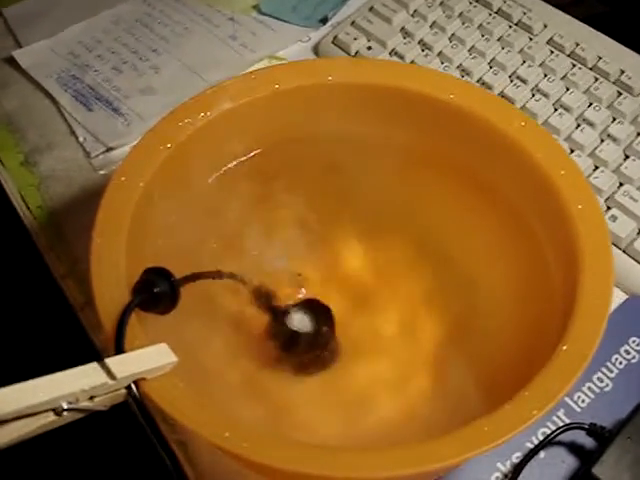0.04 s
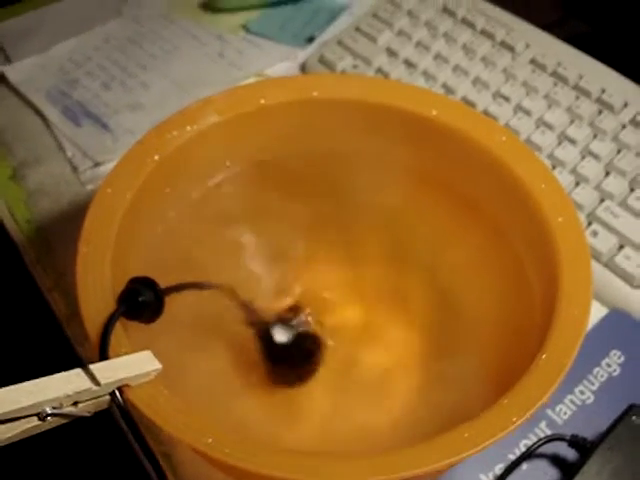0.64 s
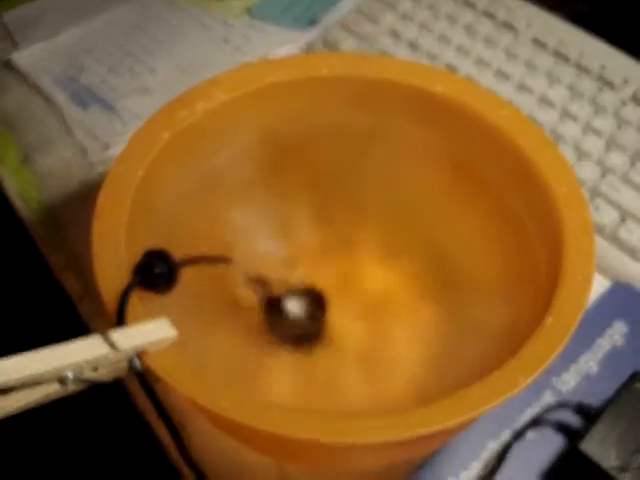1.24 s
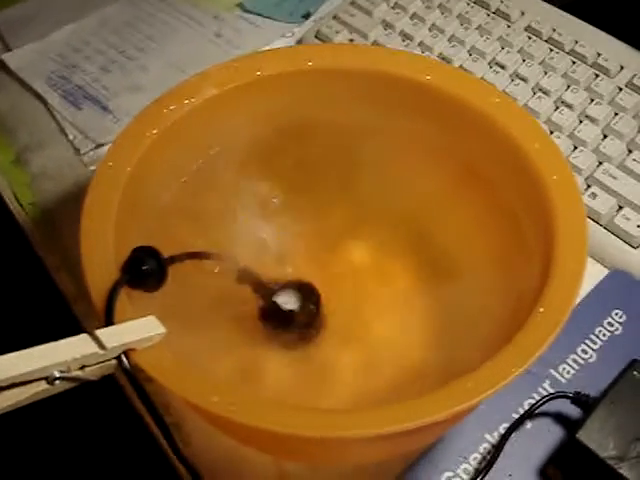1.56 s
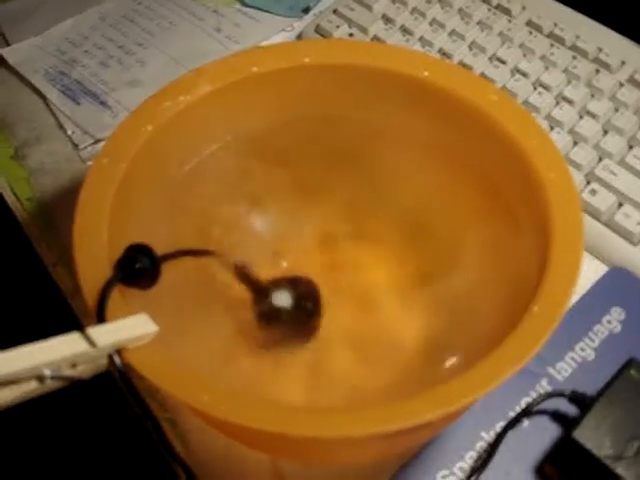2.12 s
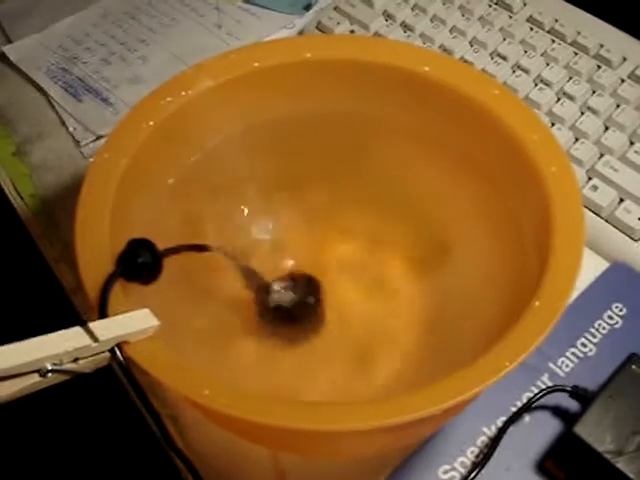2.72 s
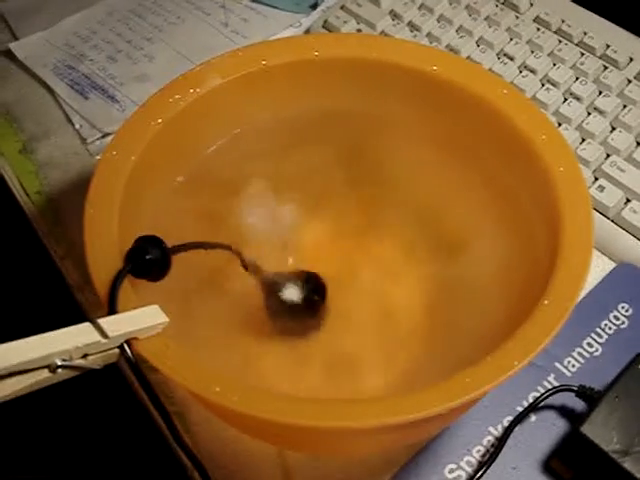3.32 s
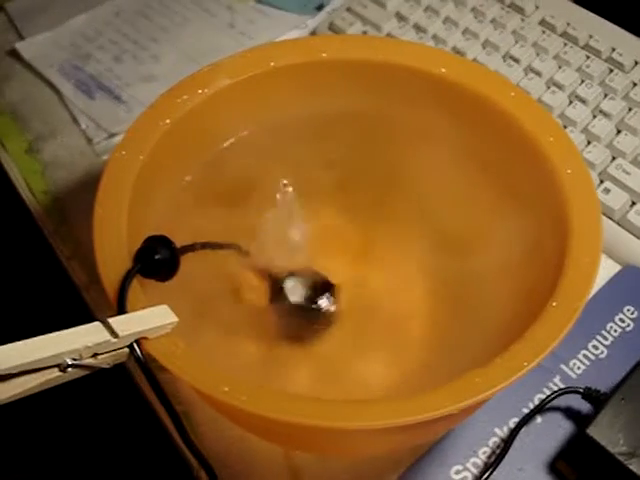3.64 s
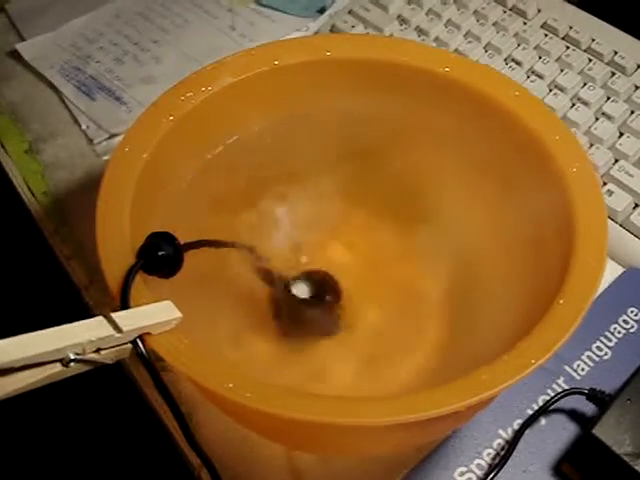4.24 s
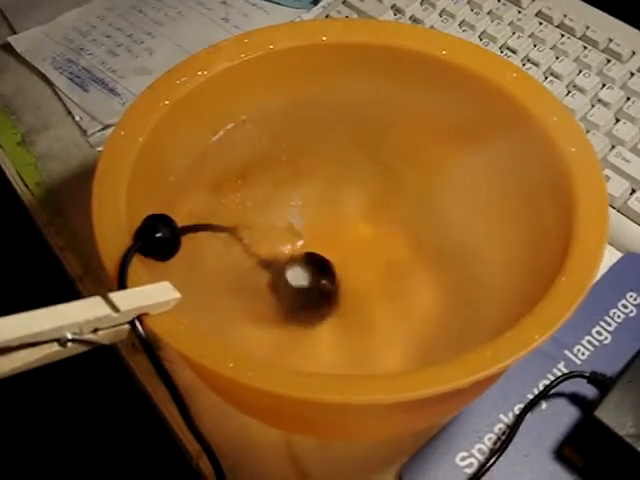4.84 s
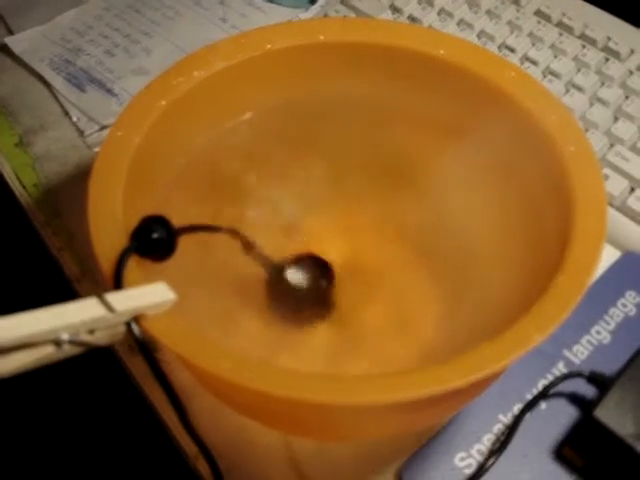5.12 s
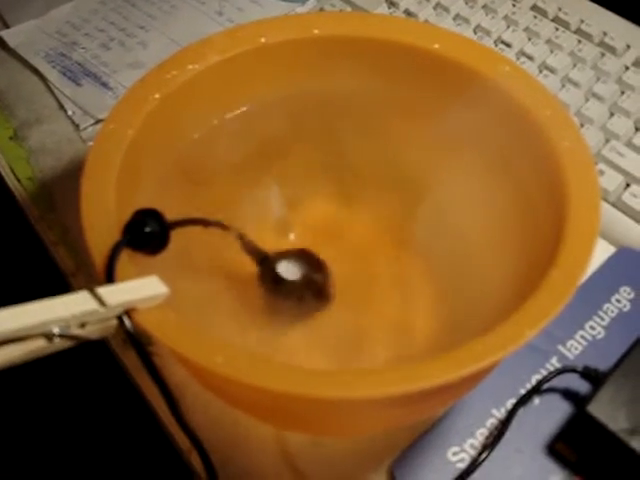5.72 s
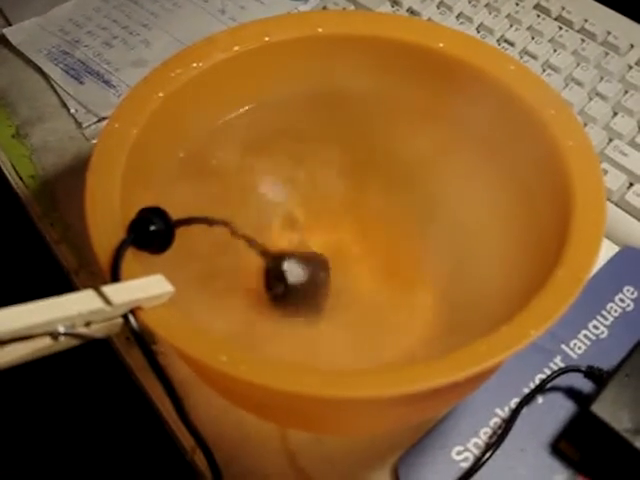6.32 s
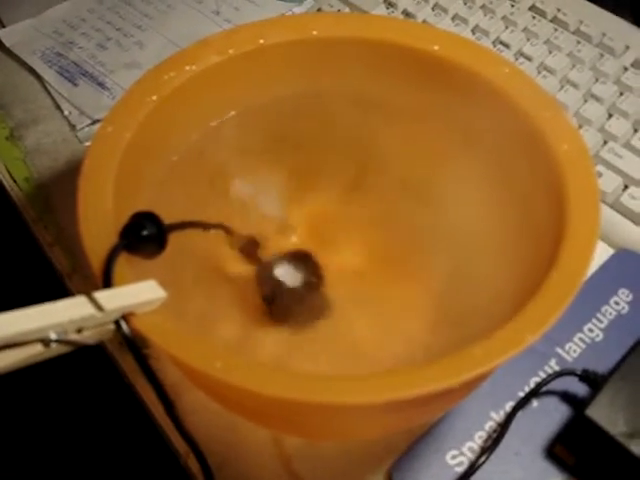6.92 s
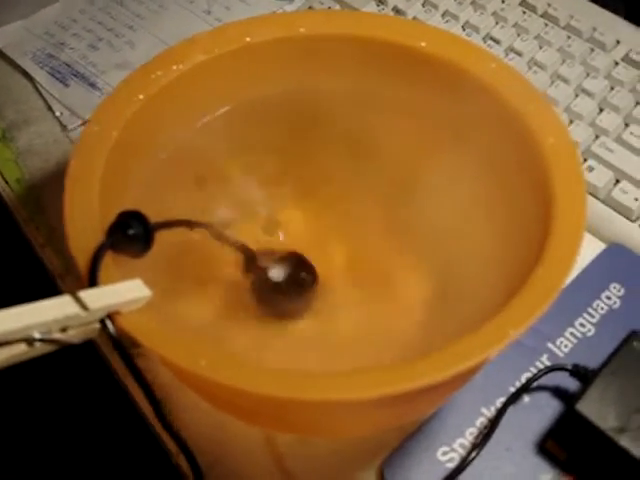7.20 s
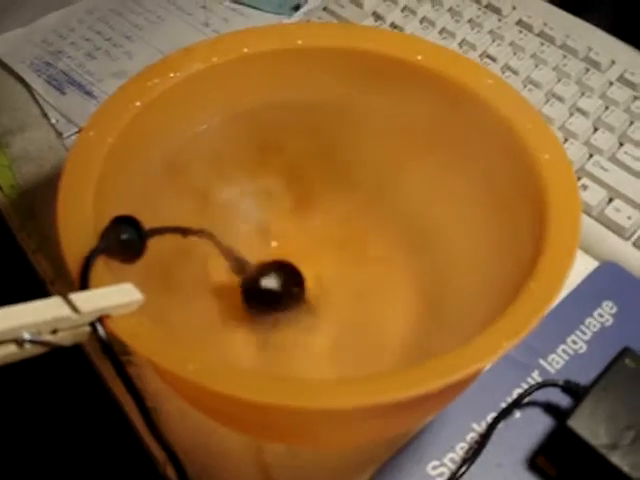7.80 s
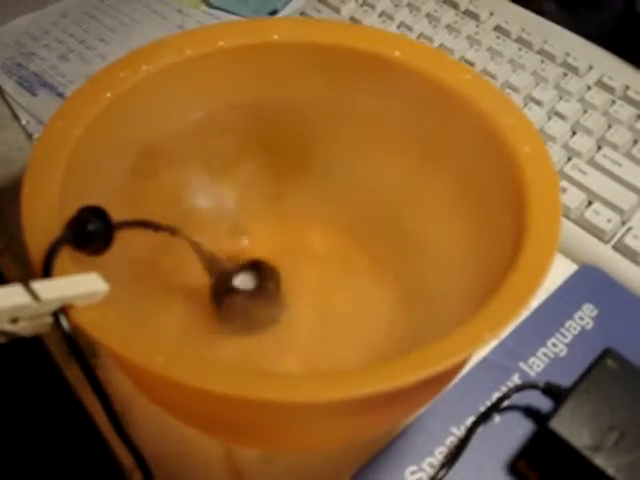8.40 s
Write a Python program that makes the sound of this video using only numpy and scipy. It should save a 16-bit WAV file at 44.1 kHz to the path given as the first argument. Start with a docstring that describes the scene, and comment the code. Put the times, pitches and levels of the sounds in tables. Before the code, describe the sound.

A small mist maker runs in a plastic bucket of water, heard close up in a quiet room with almost no echo. Throughout, the soft hum and airy rush of a computer fan lie under a thin electronic whine, a faint even hiss and barely audible specks of spray. The water spits short, sharp ticks at about 0.3, 0.5, 1.1, 2.5 and 3.8 seconds. Between them, stray droplets make tiny high plinks, around 0.1, 1.2, 1.7, 3.4 and 3.8 seconds, and one lands with a dry tap near 2.8 seconds. From about 5.1 to 6.4 seconds the droplets cluster into brighter, louder plinks, the strongest at 6 seconds. The fan's whirr drops slightly at around 5.5 seconds. After the cluster, the hum, whine, hiss and faint spray carry on steadily until the end at about 8.4 seconds.

```python
"""An ultrasonic mist maker runs in a plastic bucket of water on a desk in a quiet room.
From the start a hum and rush, most likely a computer fan, lie under an electronic whine and mist hiss.
For four seconds the fountain spits sharp ticks, and stray droplets trap bubbles that ring briefly;
one lands with a dry tap near 2.8 s. Around 6 s the droplets cluster and the fan's whirr sinks.
The steady sounds and a faint spray carry on to the end."""
import sys
import numpy as np
from scipy import signal
from scipy.fft import rfft, irfft
from scipy.io import wavfile
from scipy.ndimage import uniform_filter1d

SR = 44100
rng = np.random.default_rng(int(sys.argv[2]) if len(sys.argv) > 2 else 0)


def to_wav(s):
    """Save 16-bit WAV."""
    ch = np.atleast_2d(s).T  # columns
    pcm = np.round(np.clip(ch, -1, 1) * 32767)  # PCM
    wavfile.write(sys.argv[1], SR, pcm.astype(np.int16))


N = 373086


def undb(db):
    """Amplitude ratio of a level in decibels: tenfold for every 20 dB."""
    return 10 ** (np.asarray(db) / 20)


def walk(rate_hz):
    """Low-pass random drift: held random values, smoothed twice, with a spread near 1."""
    hold = max(int(SR / rate_hz), 2)
    held = np.repeat(rng.standard_normal(N // hold + 1), hold)
    return 1.332 * uniform_filter1d(uniform_filter1d(held, hold), hold)[:N]


def coloured_noise(spectrum, resonances=()):
    """Spectral shaping: white noise takes a density in dB per Hz, plus bell-shaped peaks and dips."""
    hz = np.maximum(np.fft.rfftfreq(N, 1 / SR), 1)
    at_hz, at_db = np.transpose(spectrum)
    db = np.interp(np.log(hz), np.log(at_hz), at_db)
    for centre, width, lift in resonances:
        db = db + lift * .5 ** ((2 * (hz - centre) / width) ** 2)
    return irfft(rfft(rng.standard_normal(N)) * undb(db) * np.sqrt(SR / 2), N)


def ring(hz, t60_s, glide=0., attack_s=.0001, size=4096):
    """Damped oscillation: a struck resonance whose pitch moves by the share `glide` as it decays."""
    t = np.arange(size) / SR
    pitch = hz * (1 + glide * np.minimum(t / t60_s, 1))
    envelope = np.exp(-np.log(1000) * t / t60_s) * (1 - np.exp(-t / attack_s))
    return envelope * np.sin(2 * np.pi * np.cumsum(pitch) / SR)


def bucket(x, echoes):
    """Comb filtering: the direct sound interferes with its quick reflections inside the bucket."""
    hz = np.fft.rfftfreq(len(x), 1 / SR)
    paths = 1 + sum(gain * np.exp(-2j * np.pi * hz * delay_s) for delay_s, gain in echoes)
    return irfft(rfft(x) * paths, len(x))


def scatter(x, t60_s, wet_db, gap_s, size=16384):
    """Diffuse reflection: a random tail starts after a short gap and decays exponentially."""
    t = np.arange(size) / SR
    tail = rng.standard_normal(size) * np.exp(-np.log(1000) * t / t60_s) * np.clip(t / gap_s - 1, 0, 1)
    return undb(wet_db) * signal.fftconvolve(x, tail / np.linalg.norm(tail))[:N]


def fan(shaft_hz=47.56, blades=7, wander=.001126, flutter_db=1.5, flutter_db_per_order=.1536):
    """Rotation gives harmonics of a wandering shaft rate; turbulence adds a rush and a narrow whirr."""
    # harmonics of the hum: shaft_multiple, level_db
    harmonics = [(5, -64), (6, -81), (7, -63), (9, -77), (12, -83), (14, -69), (20, -75.5), (21, -75.5),
                 (24, -74.5), (28, -77)]
    # blade-passing tone, fuller at first: time_s, gain_db
    blade_gain = [(0, 1.5), (2.8, 0.7), (3.5, -.4), (8.4, 0)]
    # its octave, which grows clearer: time_s, gain_db
    octave_gain = [(0, -2), (3, -2), (3.7, 1.2), (8.4, .3)]
    # strongest resonance of the rush: frequency_hz, density_db_per_hz
    whirr_spectrum = [(660, -130), (740, -86.5), (760, -82.5), (780, -80), (805, -88.5), (870, -130)]
    # the whirr sinks late on: time_s, gain_db
    whirr_gain = [(0, 1.9), (5.3, 2), (5.8, -2.7), (8.4, -1.3)]
    # rush of air: frequency_hz, density_db_per_hz
    air_spectrum = [(8, -89), (28, -83), (50, -94.5), (100, -91), (200, -86), (400, -83.5), (580, -88),
                    (880, -86.5), (1250, -87), (2000, -89), (2600, -90), (3300, -94), (5000, -100),
                    (10000, -106)]
    # hollow resonances and dips in the rush: centre_hz, width_hz, lift_db
    hollows = [(474, 56, 4.3), (560, 70, -0.5), (660, 42, 4.5), (758, 88, 7), (1012, 94, 6),
               (1111, 59, 5.5), (1323, 56, 1.5), (1570, 217, 5.5), (1768, 145, 4), (2880, 87, -4.5),
               (3000, 210, 2), (3270, 85, -3.5)]
    t = np.arange(N) / SR
    turns = np.cumsum(shaft_hz * (1 + wander * walk(1.5))) / SR
    hum = np.zeros(N)
    for order, db in harmonics:
        phase = 2 * np.pi * (order * turns + rng.random())
        # the higher harmonics waver more
        waver_db = flutter_db + flutter_db_per_order * (min(order, 2 * blades) - harmonics[0][0])
        if order == blades:
            db = db + np.interp(t, *np.transpose(blade_gain))
        if order == 2 * blades:
            db = db + np.interp(t, *np.transpose(octave_gain))
        hum += np.sqrt(2) * undb(db + waver_db * walk(5)) * np.sin(phase)
    whirr_db = np.interp(t, *np.transpose(whirr_gain))
    whirr = coloured_noise(whirr_spectrum) * undb(whirr_db + .5 * walk(4.02))
    rush = coloured_noise(air_spectrum, hollows) * undb(.35 * walk(5.2))
    return hum + whirr + rush


def whine(switch_hz=500, centre_hz=3000, centre_db=-76, fall_db=7, buzz_hz=52, sideband_db=4.5):
    """Amplitude modulation: a buzz puts a sideband above and below each switching overtone."""
    # lone steady tones of the electronics: pitch_hz, level_db
    lone_tones = [(194, -71.5), (3126, -78), (3305, -81), (4000, -76), (5050, -81), (8000, -79.5),
                  (8032, -73.5)]
    tones = list(lone_tones)
    for step in (-1, 0, 1):
        hz, db = centre_hz + step * switch_hz, centre_db - fall_db * abs(step)
        tones += [(hz, db), (hz - buzz_hz, db + sideband_db), (hz + buzz_hz, db + sideband_db)]
    t = np.arange(N) / SR
    out = np.zeros(N)
    for hz, db in tones:
        amplitude = np.sqrt(2) * undb(db + 1.5 * walk(2.27))
        out += amplitude * np.sin(2 * np.pi * (hz * t + rng.random()))
    return out


def mist(flicker_db=1.2):
    """Incoherent summation: countless tiny droplets torn off the fountain merge into an even hiss."""
    # hiss of the mist: frequency_hz, density_db_per_hz
    hiss_spectrum = [(500, -120), (2500, -103), (4000, -100), (5400, -98), (6600, -101), (8000, -100),
                     (10000, -102)]
    return coloured_noise(hiss_spectrum) * undb(flicker_db * walk(19))


def slap(low_hz, high_hz, t60_s, size=4096):
    """Impact noise: a landing droplet gives a brief burst over a broad band."""
    fade = np.exp(-np.log(1000) * np.arange(size) / SR / t60_s)
    band = signal.butter(1, [low_hz, min(high_hz, SR / 3)], "bandpass", fs=SR, output="sos")
    return signal.sosfilt(band, 2 * fade * rng.standard_normal(size))


def drops(echo_gain=.44):
    """Bubble resonance: a droplet slaps the water and its trapped air rings; the wall echoes both."""
    # droplets that trap a bubble:
    # start_s, pitch_hz, level_db, ring_cycles, slap_relative_db, glide_share, echo_delay_s
    droplets = [(0.0965, 7550, -37, 45, -12, 0, .0017), (1.205, 5230, -36, 38, -8, .05, .0017),
                (1.724, 3157, -37, 32, -2, .1, 0.00177), (3.445, 7360, -37, 40, -1, .05, .0017),
                (3.7995, 2720, -41, 55, -7, .1, .0018), (3.8053, 9150, -31, 50, -13, 0, .0017),
                (5.124, 7550, -39, 45, -5, .05, .0017), (5.4602, 5417, -25.5, 35, -10, 0.085, .00169),
                (5.708, 3880, -25.5, 26, -8, -.175, .00162), (5.7195, 3750, -43, 40, -11, 0, .0016),
                (6.006, 3654, -19.5, 58, -8, -0.21, 0.002055), (6.0065, 4430, -27, 36, -12, -.1, .00165),
                (6.0262, 3520, -46, 50, -7, 0, .0017), (6.0543, 2720, -26.5, 36, -2, -.06, 0.0018),
                (6.1635, 4650, -43, 45, -10, .05, .0017), (6.3662, 5450, -33.5, 35, -6, .1, .00168)]
    out = np.zeros(N)
    for start_s, hz, db, cycles, slap_db, glide, echo_s in droplets:
        # a smaller drop makes both a higher bubble and a higher slap
        splash = undb(slap_db) * slap(.96 * hz, 1.4 * hz, t60_s=.0042)
        low_cut = signal.butter(4, .88 * hz, "highpass", fs=SR, output="sos")
        plink = undb(db) * (ring(hz, cycles / hz, glide) + signal.sosfilt(low_cut, splash))
        add(out, start_s, bucket(plink, [(echo_s, echo_gain)]))
    # weaker echoes follow from all round the bucket
    return out + scatter(out, t60_s=.017, wet_db=-14, gap_s=.002)


def spray(count=40, base_db=-57, spread_db=3, low_hz=4500, high_hz=9000, ring_cycles=70):
    """Small bubbles resonate high: the finest drops fall back at random, barely above the hiss."""
    out = np.zeros(N)
    for when, pitch, weight in rng.random((count, 3)):
        hz = low_hz * (high_hz / low_hz) ** pitch
        db = base_db + spread_db * min(-np.log(1 - weight), 2)
        add(out, when * N / SR, undb(db) * ring(hz, ring_cycles / hz))
    return out


def spits(low_hz=1350, high_hz=6750, spread_db=1.1, detune=.006):
    """Impulse excitation: each spit snaps through the surface and rings the same modes in its own mix."""
    # spits of the fountain: start_s, gain_db, tilt_db_per_octave, snap_hz, snap_db
    events = [(0.2707, 2, .2, 4420, -24), (0.5448, -2.5, -1, 4800, -30), (1.1391, -0.5, -5, 4570, -27),
              (2.481, .9, -.3, 4600, -29), (3.7506, -0.5, 0.2, 5000, -23)]
    # resonances that a spit excites: pitch_hz, level_db, t60_s
    modes = [(2640, -18.5, 0.013), (2230, -34, 0.0079), (3170, -37, 0.018), (3550, -32, 0.015),
             (3940, -24, .0134), (4550, -25.5, 0.008), (5040, -38, 0.0098), (5550, -28, .0034),
             (6450, -43.5, 0.014)]
    # reflections from the water and the bucket wall: delay_s, gain
    echoes = [(.000645, .67), (.001615, 1.48), (.001945, .23), (.002539, .66), (.004232, .29),
              (.00765, .08)]
    out = np.zeros(N)
    for start_s, db, tilt_db, snap_hz, snap_db in events:
        tick = undb(snap_db) * ring(snap_hz, t60_s=.0015)
        for hz, mode_db, t60_s in modes:
            louder, higher = rng.standard_normal(2)
            gain = undb(mode_db + tilt_db * np.log2(hz / modes[0][0]) + spread_db * louder)
            tick += gain * ring(hz * (1 + detune * higher), t60_s)
        add(out, start_s, undb(db) * bucket(tick, echoes))
    # the rippling surface scatters the ticks
    out += scatter(out, t60_s=.009, wet_db=-16, gap_s=.0015)
    # so small a source radiates no bass
    out = signal.sosfilt(signal.butter(2, low_hz, "highpass", fs=SR, output="sos"), out)
    # a soft, watery contact has little top
    return signal.sosfilt(signal.butter(6, high_hz, fs=SR, output="sos"), out)


def tap(start_s=2.8339):
    """Damped impact: a droplet knocks, probably on the plastic, with no bubble; the bucket scatters it."""
    out = np.zeros(N)
    add(out, start_s, undb(-24.5) * ring(hz=2020, t60_s=.0054))
    add(out, start_s, undb(-30.5) * slap(low_hz=2000, high_hz=4200, t60_s=.0032))
    return out + scatter(out, t60_s=.04, wet_db=-3, gap_s=.0013)


def add(out, start_s, sound):
    """Superposition: a sound sums into the mix from its start time."""
    start = max(int(start_s * SR), 0)
    out[start:start + len(sound)] += sound[:N - start]


def scene():
    """Water sounds reverberate faintly in a small dead room over the steady sources, in two like channels."""
    water = spits() + drops() + tap() + spray()
    room = scatter(water, t60_s=.18, wet_db=-46.5, gap_s=.003)
    mono = water + room + fan() + whine() + mist()
    return np.array([mono, mono])


def record(dry, top_hz=9980):
    """Band limiting: an elliptic low-pass cuts the top steeply."""
    return signal.sosfilt(signal.ellip(12, .1, 70, top_hz, fs=SR, output="sos"), dry)


dry = scene()
out = record(dry)
to_wav(out)
```